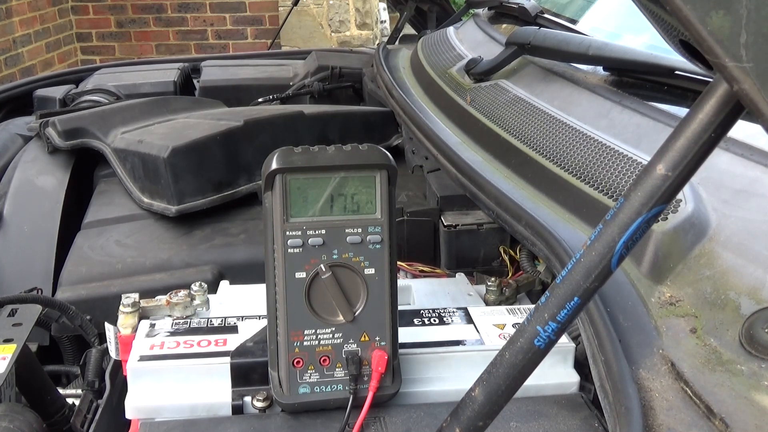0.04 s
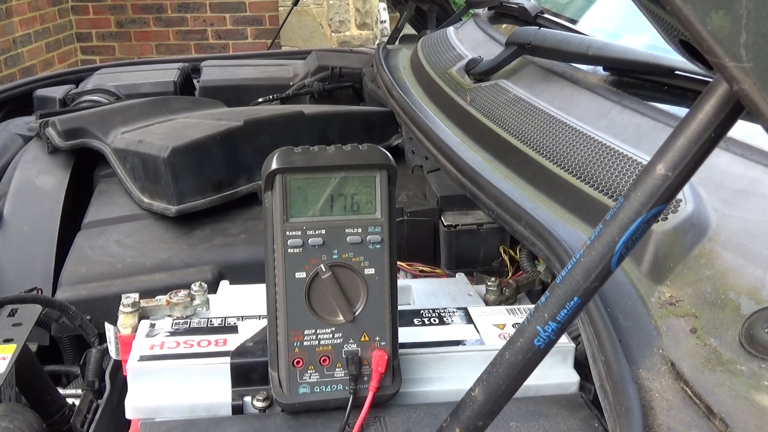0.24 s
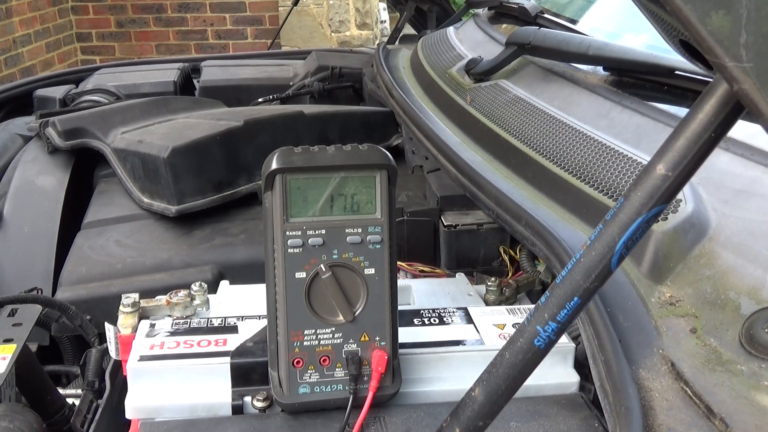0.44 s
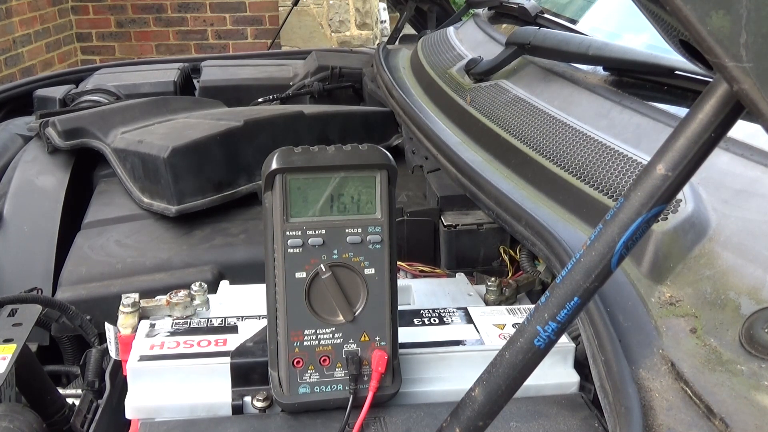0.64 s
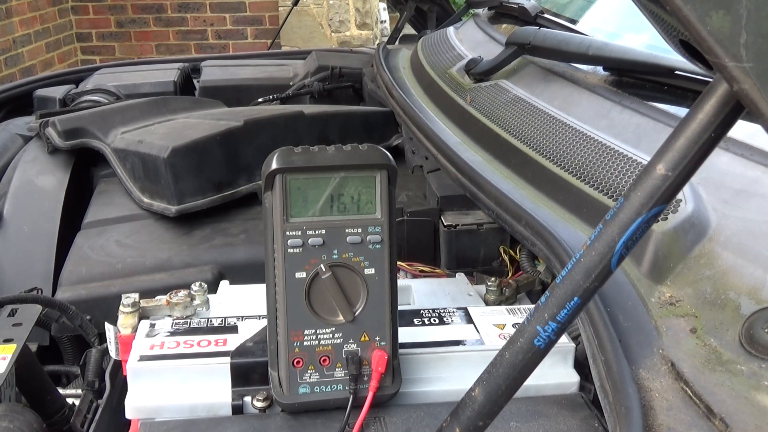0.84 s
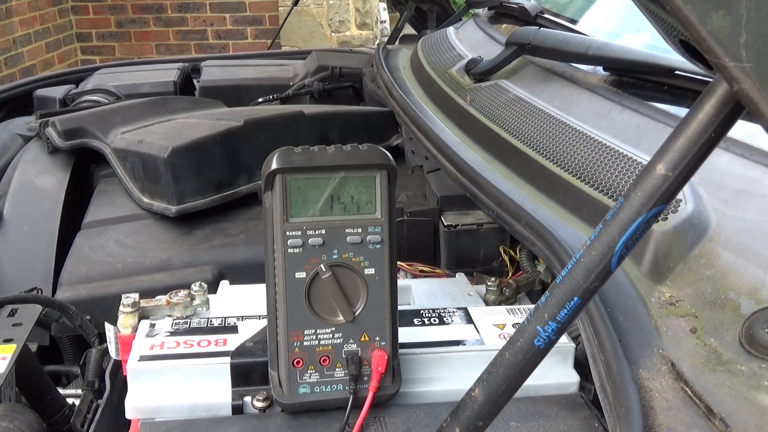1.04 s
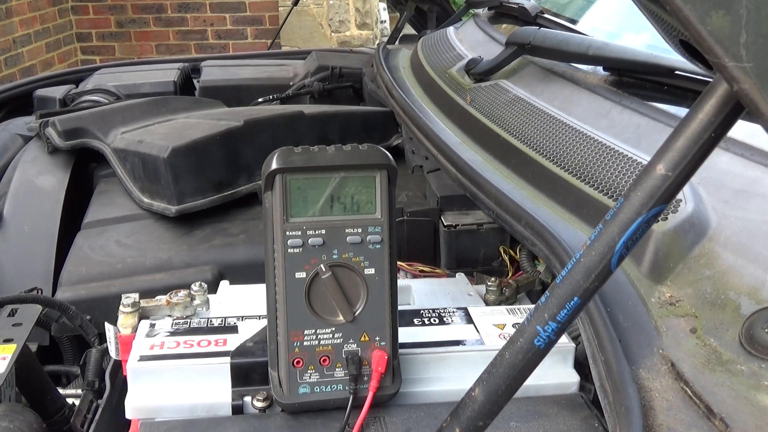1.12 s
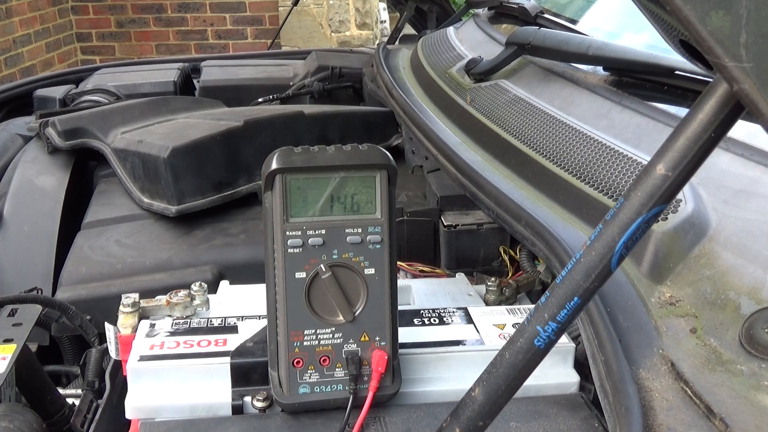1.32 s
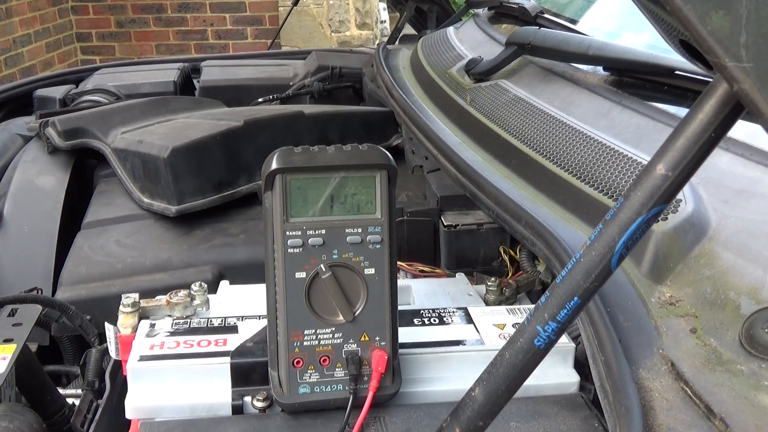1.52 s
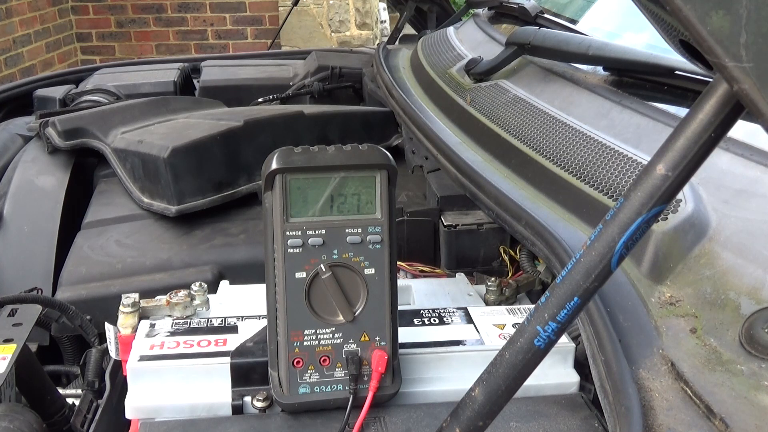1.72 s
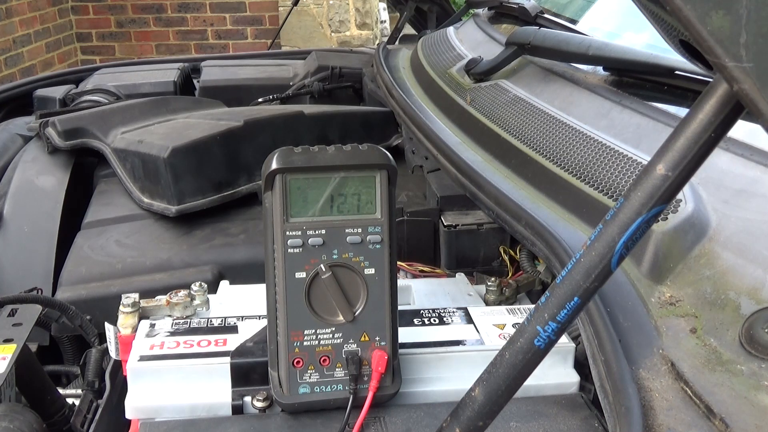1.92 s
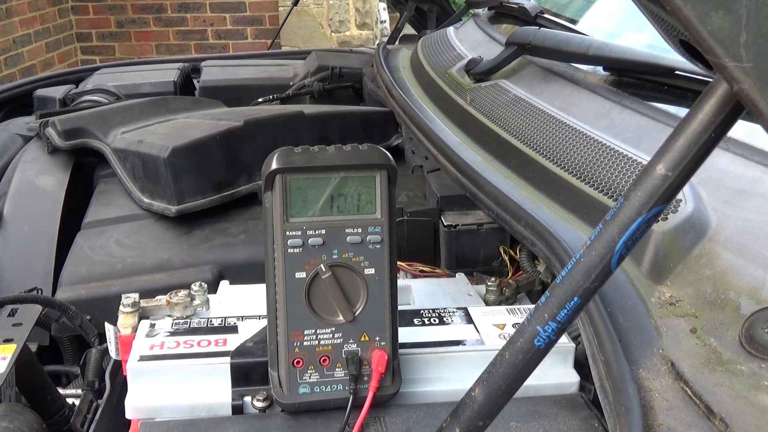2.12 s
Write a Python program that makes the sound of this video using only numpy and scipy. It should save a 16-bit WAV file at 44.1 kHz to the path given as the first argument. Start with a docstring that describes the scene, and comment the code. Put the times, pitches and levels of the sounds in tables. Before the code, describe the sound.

A car starter solenoid chatters rapidly on a flat battery, failing to crank the engine.

```python
"""Outdoors, over the open engine bay of a car whose flat battery fails to crank it. The starter solenoid
chatters about 15 times a second: its plunger slams in, the voltage collapses, it drops back with a thud
and rebounds, ringing the housing. A faint rustle and a relay tick come just before; after the last
clack the bay rings out and three small relay clicks sound over a faint outdoor rumble."""
import sys
import numpy as np
from scipy import signal
from scipy.fft import rfft, irfft, next_fast_len
from scipy.io import wavfile
from scipy.ndimage import uniform_filter1d

SR = 44100
rng = np.random.default_rng(int(sys.argv[2]) if len(sys.argv) > 2 else 0)


def transcribe(u):
    """Save the signal u as a 16-bit wav file named by the first command-line argument.

    u: samples, shape (n,) or (channels, n), limited to [-1, 1]; the rate is SR.
    q: integer samples, one column per channel.
    """
    v = np.clip(np.atleast_2d(u).T, -1, 1)
    q = np.round(v * 32767).astype(np.int16)
    wavfile.write(sys.argv[1], SR, q)


N = 94815
HIT_N = 12000
HIT_TIME_S = (np.arange(HIT_N) - SR // 100) / SR  # contact at 0, 10 ms in


def amp(db):
    """Decibels to gain."""
    return 10 ** (np.asarray(db) / 20)


def unit_rms(x):
    """Scale to rms 1."""
    return x / np.sqrt(np.mean(x ** 2) + 1e-20)


def curve(points, hz):
    """Interpolate (freq_hz, value) points on a log frequency axis."""
    freq_hz, values = np.transpose(points)
    return np.interp(np.log(hz + 1), np.log(freq_hz + 1), values)


def filtered(x, response):
    """Apply the gain response(hz)."""
    n = x.shape[-1]
    padded = next_fast_len(n + 2048)
    return irfft(rfft(x, padded) * response(np.fft.rfftfreq(padded, 1 / SR)), padded)[..., :n]


def envelope(rise_s, t60_s):
    """Quick swell around the contact, then exponential decay."""
    swell = (1 + np.tanh(HIT_TIME_S / rise_s / 2)) / 2
    return swell * amp(-60 * np.maximum(HIT_TIME_S, 0) / t60_s)


def add_hit(out, at_s, hit):
    """Mix in a hit with its contact at at_s."""
    i = max(0, round((at_s + HIT_TIME_S[0]) * SR))
    out[:, i:i + HIT_N] += hit[:, :max(0, N - i)]


# stereo width, side relative to mid: freq_hz, side_db
WIDTH = [(100, -30), (400, -18.5), (750, -13), (2000, -12), (3500, -11), (6000, -7), (9000, -12),
         (13000, -25)]

def noise(spectrum, n=HIT_N):
    """Coloured stereo noise, rms 1."""
    def response(hz):
        mid_db = curve(spectrum, hz)
        return amp([mid_db, mid_db + curve(WIDTH, hz)])
    mid, side = filtered(rng.standard_normal((2, n)), response)
    return unit_rms(np.array([mid + side, mid - side]))


# outdoor background spectrum: freq_hz, relative_db
OUTDOOR_SPECTRUM = [(25, -27), (46, -3.5), (65, -12.5), (120, -9), (200, -7.5), (290, -6.5), (450, -15),
                    (1200, -22), (3000, -36), (8000, -38), (15800, -41)]

def outdoor_rumble():
    """Faint, steady low noise of the open air."""
    return amp(-46.5) * noise(OUTDOOR_SPECTRUM, N)


# engine bay reverberation: freq_hz, t60_s
BAY_DECAY = [(100, 0.25), (900, .6), (1900, 0.45), (4000, 0.55), (8000, 0.53), (15000, 0.34)]

def bay_reverb(source):
    """The bay rings on, longest in the middle of the spectrum."""
    white = noise([(20, 0), (20000, 0)])
    hz, t, bands = signal.stft(white, SR, nperseg=256)
    decay = amp(-60 * t / curve(BAY_DECAY, hz)[:, None])
    _, tail = signal.istft(bands * decay, SR, nperseg=256)
    return signal.fftconvolve(source, tail / np.linalg.norm(tail[0]), axes=1)[:, :N]


# rustle spectrum: freq_hz, relative_db
RUSTLE_SPECTRUM = [(100, -13), (350, 2), (900, -12), (1400, -1), (2500, -13), (9000, -28), (15800, -39)]

def rustle():
    """One soft, short burst of noise before the chatter."""
    out = np.zeros((2, N))
    burst = amp(-44) * envelope(rise_s=0.0044, t60_s=0.11) * noise(RUSTLE_SPECTRUM)
    add_hit(out, at_s=0.038, hit=burst)
    return out


# relay switchings: start_s, click_db, ring_hz, t60_s, knock_db
RELAY_CLICKS = [(0.0836, -29.5, 2190, 0.039, -55), (2.0416, -29, 4020, 0.021, -36),
                (2.0603, -31, 2470, 0.043, -39), (2.123, -31.5, 4000, 0.062, -34)]
# click and knock spectra: freq_hz, relative_db
CLICK_SPECTRUM = [(200, -15), (1000, -15), (1900, -2.5), (2900, -8), (4200, -7), (6500, -21.5),
                  (10000, -7.5), (15800, -20)]
KNOCK_SPECTRUM = [(40, -14), (200, -5), (450, 3), (600, -1), (900, -13), (3000, -40)]

def relays(ring_db=5.5, ring_width_oct=0.3, knock_delay_s=0.0065):
    """Each relay gives a sharp click with one resonance, then a dull knock."""
    out = np.zeros((2, N))
    for start_s, click_db, ring_hz, t60_s, knock_db in RELAY_CLICKS:
        resonance = lambda hz: amp(ring_db * np.exp(-(np.log2((hz + 1) / ring_hz) / ring_width_oct) ** 2))
        click = envelope(rise_s=0.00027, t60_s=t60_s) * unit_rms(filtered(noise(CLICK_SPECTRUM), resonance))
        knock = envelope(rise_s=0.001, t60_s=0.05) * noise(KNOCK_SPECTRUM)
        add_hit(out, start_s, amp(click_db) * click)
        add_hit(out, start_s + knock_delay_s, amp(knock_db) * knock)
    return out


def clatter(spectrum, shape):
    """Dense ring of a metal assembly: noise that follows the spectrum closely once enveloped by shape."""
    ring = noise(spectrum)
    target = amp(curve(spectrum, np.fft.rfftfreq(HIT_N, 1 / SR)))
    for _ in range(4):
        power = uniform_filter1d(np.abs(rfft(ring.mean(0) * shape)) ** 2, size=70)
        ring = irfft(rfft(ring) * target / np.sqrt(np.abs(power) + 1e-9), HIT_N)
    return ring * np.sqrt(np.mean(shape ** 2) / np.mean((ring * shape) ** 2))


# random spectral ripple per contact: freq_hz, std_db
RIPPLE = [(500, .5), (3000, 1.2), (8000, 2.2), (14000, 2.4)]
# spectral weights of a cycle's treble_db and bite_db: freq_hz, weight
TREBLE_WEIGHT = [(5000, 0.5), (7000, -0.03), (8400, -0.1), (9900, 2.27), (11200, 1.8), (12700, -0.96),
                 (14500, 2.1)]
BITE_WEIGHT = [(2600, -0.5), (3300, 1.5), (3900, 0), (4500, 0), (5100, -1.45), (7200, -0.2), (7900, 0)]

def contacts(times_s, levels_db, trebles_db, bites_db, spectrum, shape, repeat_share, ripple_step_hz=700):
    """One hit per cycle: the same parts meet, never quite alike, so the clatter only partly repeats."""
    out = np.zeros((2, N))
    repeated = np.sqrt(repeat_share) * clatter(spectrum, shape)
    knots_hz = np.arange(0, SR / 2, ripple_step_hz)
    for at_s, level_db, treble_db, bite_db in zip(times_s, levels_db, trebles_db, bites_db):
        fresh = np.sqrt(1 - repeat_share) * noise(spectrum)
        ripple_db = curve(RIPPLE, knots_hz) * rng.standard_normal(len(knots_hz))
        tint = lambda hz: amp(treble_db * curve(TREBLE_WEIGHT, hz) + bite_db * curve(BITE_WEIGHT, hz)
                              + np.interp(hz, knots_hz, ripple_db))
        add_hit(out, at_s, amp(level_db) * filtered(shape * (repeated + fresh), tint))
    return out


def ringing(times_s, levels_db, modes, rise_s, scatter_db=3.26):
    """Struck modes: decaying sines whose levels scatter from hit to hit."""
    out = np.zeros((2, N))
    waves = np.array([amp(db) * envelope(rise_s, t60_s) * np.sin(2 * np.pi * (hz * HIT_TIME_S + rng.random()))
                      for hz, db, t60_s in modes])
    for at_s, level_db in zip(times_s, levels_db):
        gains = amp(level_db + scatter_db * rng.standard_normal(len(modes)))
        add_hit(out, at_s, (gains @ waves)[None])
    return out


# thud spectrum: freq_hz, relative_db
THUD_SPECTRUM = [(50, -12), (95, -40), (128, 0), (190, -8), (270, -1.5), (340, -7), (500, -4.5), (1200, -3),
                 (4000, -47)]
# engine mount mode: pitch_hz, relative_db, t60_s
MOUNT_MODES = [(126, -42.5, .14)]

def thud(cycle_s, gain_db, treble_db, bite_db, delay_s=0.021, rise_s=0.0018):
    """The returning plunger lands with a thud; the engine mount booms under it."""
    impact = contacts(cycle_s + delay_s, gain_db - 37.5, treble_db, bite_db,
                      THUD_SPECTRUM, envelope(rise_s, t60_s=0.19), repeat_share=0.47)
    boom = ringing(cycle_s + delay_s, gain_db / 2, MOUNT_MODES, rise_s)
    return impact + boom


# drop-out and rebound spectra: freq_hz, relative_db
DROP_SPECTRUM = [(80, -30), (250, -46), (520, -0.5), (900, -3), (1150, -10.5), (1500, -7.5), (2050, 3),
                 (2700, 1.5), (3700, 2), (4500, -6.5), (5500, 3), (6500, -28), (8000, -37), (12400, -1),
                 (15800, -30)]
REBOUND_SPECTRUM = [(200, -34), (1500, -3), (3600, 3), (5500, 2.5), (12000, -3), (15800, -21)]
# starter housing modes: pitch_hz, relative_db, t60_s
HOUSING_MODES = [(500, -40, .13), (807, -42.5, .24), (1020, -33.5, .17), (1207, -37, .15), (1403, -38, .15),
                 (1629, -32.5, .21), (1806, -35, .18), (1969, -35, .17), (2010, -34, .16), (2121, -31, .19),
                 (3328, -35, .15), (3730, -33, .14), (4369, -35, .17), (4608, -37, .16), (4960, -37, .16)]

def drop_out(cycle_s, gain_db, treble_db, bite_db, delay_s=0.0195, rise_s=0.0039, rebound_delay_s=0.0338):
    """The voltage collapses: the plunger falls back, rings the housing and rebounds once."""
    drop = contacts(cycle_s + delay_s, gain_db - 23.5, treble_db, bite_db,
                    DROP_SPECTRUM, envelope(rise_s, t60_s=0.15), repeat_share=0.47)
    rebound = contacts(cycle_s + rebound_delay_s, gain_db - 28, treble_db, bite_db,
                       REBOUND_SPECTRUM, envelope(rise_s=0.00017, t60_s=0.032), repeat_share=0.47)
    housing = ringing(cycle_s + delay_s, gain_db - 2.5, HOUSING_MODES, rise_s)
    return drop + rebound + housing


# slam and seating snap spectra: freq_hz, relative_db
SLAM_SPECTRUM = [(60, -39), (160, -12), (400, -3.5), (700, -8), (1100, -0.5), (1500, 2.5), (2050, 3.5),
                 (2550, -1.5), (3000, -7), (3600, 7), (4000, 2.5), (4450, 5.5), (5200, 0.5), (6000, -1.5),
                 (7200, -3), (7650, -1), (7950, 4.5), (8550, 0.5), (9000, -9), (9750, -1), (10300, -4),
                 (11300, -7), (12400, 0.5), (13600, -5.5), (15800, -20.5)]
SNAP_SPECTRUM = [(300, -54), (2500, -6), (3600, -5), (4500, -0.5), (6500, -12), (8200, 5), (8900, 9),
                 (9800, 2), (11300, -7), (12800, 12.5), (14000, -10), (15800, -10)]
# plunger modes: pitch_hz, relative_db, t60_s
PLUNGER_MODES = [(3235, -30, .1), (3372, -29, .08), (3618, -24, .08), (3812, -31, .15), (3932, -34, .14),
                 (4490, -32, .09), (8005, -36, .11), (9692, -31, .1), (9865, -32, .07), (10585, -35, .11),
                 (12365, -38, .06)]

def pull_in(cycle_s, gain_db, treble_db, bite_db, delay_s=0.001182, rise_s=0.0012, snap_delay_s=0.0035):
    """The plunger slams in, rings and seats with a hard, bright snap."""
    slam = contacts(cycle_s + delay_s, gain_db - 16.5, treble_db, bite_db,
                    SLAM_SPECTRUM, envelope(rise_s, t60_s=0.16), repeat_share=0.75)
    snap = contacts(cycle_s + snap_delay_s, gain_db - 24, treble_db, bite_db,
                    SNAP_SPECTRUM, envelope(rise_s=0.00027, t60_s=0.094), repeat_share=0.75)
    plunger = ringing(cycle_s + delay_s, gain_db + bite_db - 5.5, PLUNGER_MODES, rise_s)
    return slam + snap + plunger


# solenoid cycles, levels relative: start_s, pull_db, drop_db, treble_db, thud_db, bite_db
CYCLES = [(0.098, 1.7, 2.3, -1, 6.5, 4), (0.159, -0.9, 2.5, 1, 2.5, -3),
          (0.2156, -1.2, 2.5, 4.5, 3.5, -1.5), (0.2707, 2.5, 3.5, 0, 13, 1.8),
          (0.33, 1.1, 1.5, 0, 7.5, 2.8), (0.3899, 1.6, 1.3, 0, 7.5, 3.3), (0.4486, 1, 3, 0.4, 11.5, 4.5),
          (0.5112, 0.8, 3, 0.5, 11.5, 3.5), (0.5732, 1.5, 2.5, 1, 4.5, 1.6), (0.6343, -1.3, 1, 4, 3.5, 0.7),
          (0.696, -1.5, 1.7, 3.5, 7, 1.5), (0.758, 2, 2, -0.5, 13.5, 3), (0.8221, 2, 2, -1, 13, 5.5),
          (0.886, -1.1, 2, 3.5, 5, -0.1), (0.9492, -0.6, 3.5, 3.4, 4.5, 0.0), (1.014, -1.8, 3, 4.5, 6, 0),
          (1.076, -1, 1.8, 3.5, 8, 0.8), (1.14, 0.2, 1.3, 2.6, 9, 1.2), (1.206, 0.3, 2.5, 2, 6.5, 2),
          (1.2701, -1.0, 2.6, 3, 4.5, 0.5), (1.3355, -1.2, 2, 4, 5, -1.1), (1.4008, 0, 5, 3.1, 6.3, -1.1),
          (1.4657, 0.7, 3.5, 2.8, 6.5, 0.5), (1.531, 0, 2.5, 2.8, 4.5, -0.6),
          (1.5965, -0.1, 2.6, 3.4, 5, -0.5), (1.662, -0.4, 3.7, 3.1, 6, 0.8),
          (1.7287, -1, 4.4, 3, 0.1, -1.3), (1.7987, 0, 3, 2.5, 1, -0.2), (1.8644, 0.7, 2, 2.3, 3, 0.7)]

def solenoid(drop_jitter_s=0.0009):
    """The flat battery cannot hold the plunger in, so it pulls in and drops out over and over."""
    start_s, pull_db, drop_db, treble_db, thud_db, bite_db = np.transpose(CYCLES)
    jittered_s = start_s + drop_jitter_s * rng.standard_normal(len(start_s))
    return (pull_in(start_s, pull_db, treble_db, bite_db)
            + drop_out(jittered_s, drop_db, treble_db, bite_db / 2)
            + thud(jittered_s, thud_db, treble_db, bite_db / 2))


# stereo balance of the car: freq_hz, left_minus_right_db
BALANCE = [(100, 0.2), (400, 0.5), (750, 2.5), (2000, 2), (5500, 1.5), (9000, 0)]

def scene():
    """The starter sits deep in the bay, slightly left, over the outdoor rumble."""
    car = solenoid() + relays() + rustle()
    car = car + amp(-16.5) * bay_reverb(car)
    pan = lambda hz: amp(np.outer([0.5, -0.5], curve(BALANCE, hz)))
    return filtered(car, pan) + outdoor_rumble()


def record(dry, cutoff_hz=15950):
    """Brick-wall low-pass."""
    return filtered(dry, lambda hz: hz < cutoff_hz)


dry = scene()
out = record(dry)
transcribe(out)
```